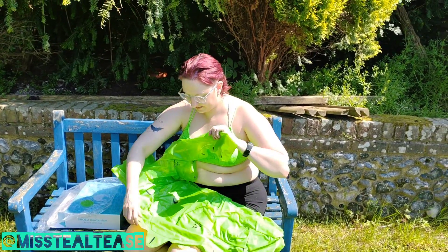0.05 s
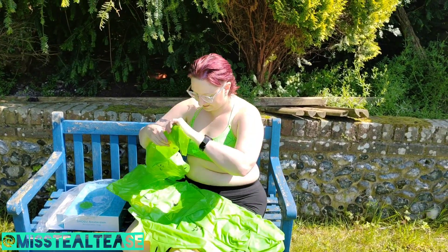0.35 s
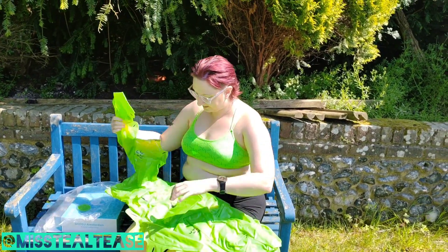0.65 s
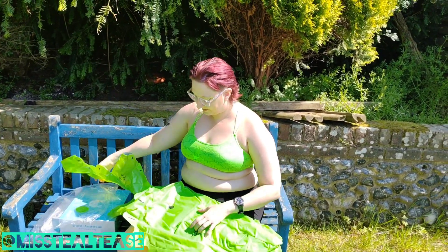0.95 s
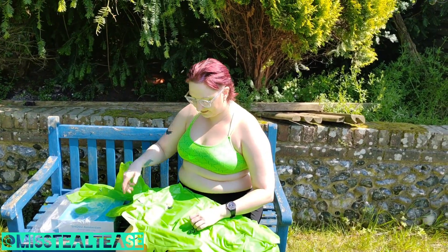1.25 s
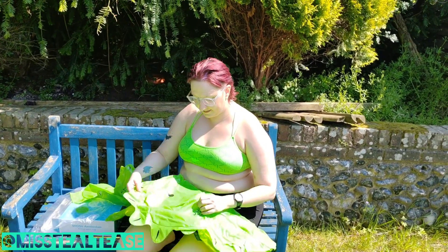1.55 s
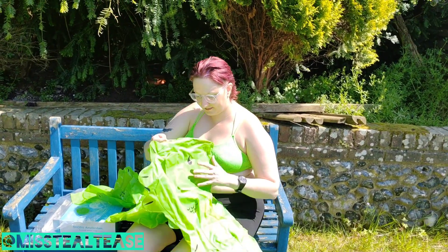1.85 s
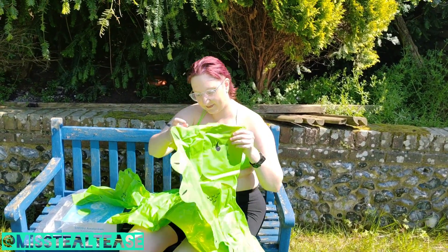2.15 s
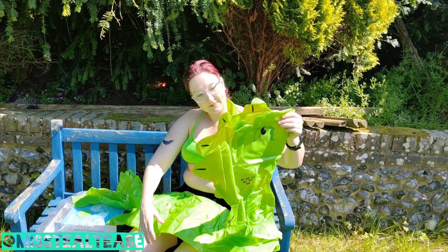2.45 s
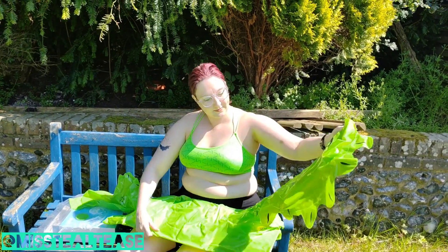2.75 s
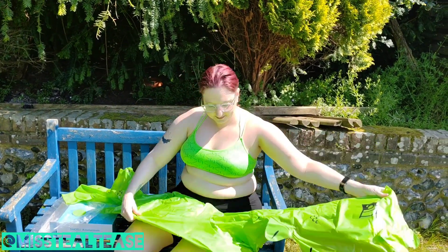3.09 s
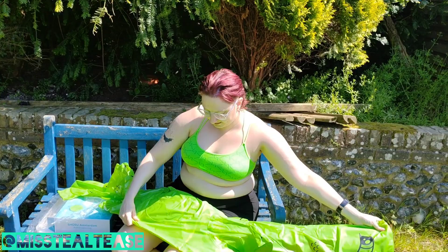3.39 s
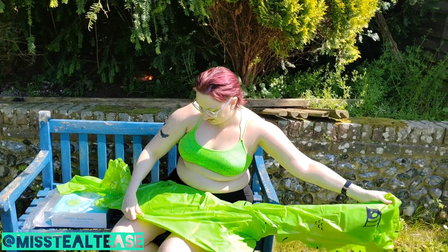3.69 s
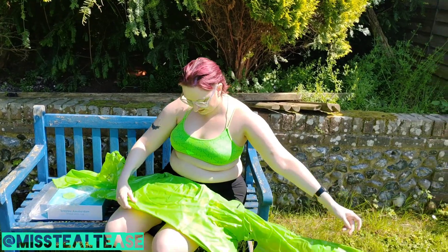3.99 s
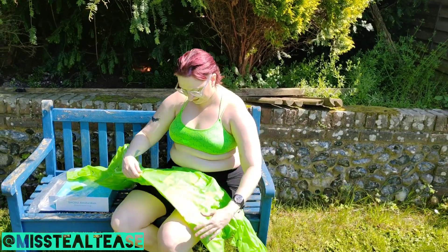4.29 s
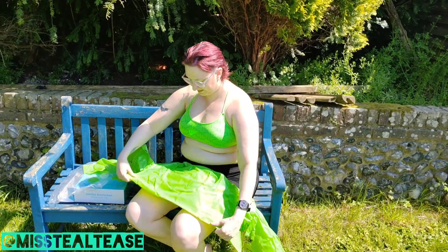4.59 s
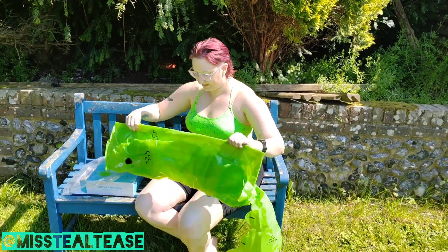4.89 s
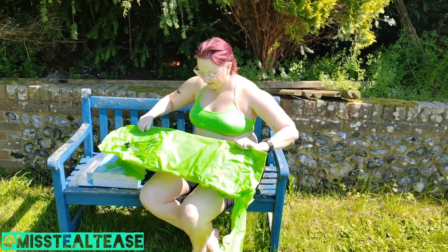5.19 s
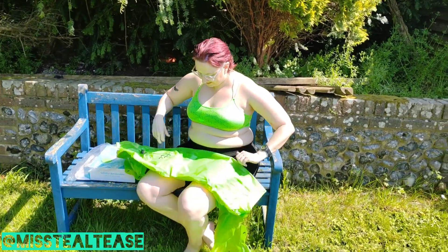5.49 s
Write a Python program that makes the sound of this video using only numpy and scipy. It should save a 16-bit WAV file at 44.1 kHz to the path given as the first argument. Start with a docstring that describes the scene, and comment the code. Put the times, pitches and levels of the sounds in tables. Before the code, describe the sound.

A small bird gives two quick, high trills while others twitter and sing short sliding chirps around a garden. Close to the microphone, a deflated vinyl inflatable is unfolded: it rustles, a fold lands with a hollow thud, and creases snap in a cluster. The birds thin out in the second half, leaving light crinkling, soft flops and a brief scrape over a faint outdoor rumble.

```python
"""First you hear a small bird's high trill and a brief rustle, over a low, distant outdoor rumble.
More birds chirp and whistle in the walled garden, each singing a nearly pure tone that slides in pitch.
Close by, a limp vinyl inflatable is unfolded on a bench: its creases snap, loose folds flop down,
and at the end vinyl scrapes on vinyl. The wall echoes the nearer birds, and the shrubs scatter
both the birdsong and the vinyl sounds."""
import sys
import numpy as np
from scipy import signal
from scipy.fft import rfft, irfft, next_fast_len
from scipy.io import wavfile
from scipy.ndimage import uniform_filter1d

SR = 44100
rng = np.random.default_rng(int(sys.argv[2]) if len(sys.argv) > 2 else 0)


def generate_wav(sig):
    """Save sig (samples, or channels by samples) to the path in sys.argv[1] as 16-bit PCM at SR."""
    pcm = np.round(np.clip(np.atleast_2d(sig).T, -1, 1) * 32767).astype(np.int16)
    wavfile.write(sys.argv[1], SR, pcm)


N = 244314
TIME = np.arange(N) / SR

# Levels compare the rows of a table; the functions turn each layer up or down afterwards.
# Tone of the outdoor background: frequency_hz, level_db
AIR_SPECTRUM = [(20, -21.5), (35, -8), (55, 1.5), (90, -4.5), (150, 4.5), (210, -4), (300, -14.5),
                (450, -21), (750, -26.5), (1200, -32), (3500, -36.5), (7000, -46.5), (16000, -52.5)]
# Slow swell of that background: time_s, level_db
AIR_LEVELS = [(0, -58), (1.0, -56), (2.1, -55), (2.9, -56), (3.2, -59.5), (3.5, -61), (3.65, -57.5),
              (4.4, -57.5), (5.54, -56)]
# High trills; each syllable is a quick fall and a held tone: start_s, fall_length_s, fall_target_hz,
# fall_db, first_held_hz, last_held_hz, held_db, held_growth_db
HIGH_TRILLS = [(0.008, 0.0066, 5070, -32, 7300, 6294, -39, 15.5),
               (0.823, 0.025, 5840, -35, 8120, 7490, -40.5, 5.5)]
# Chirps close by: start_s, length_s, start_hz, target_hz, level_db
NEAR_CHIRPS = [(0.0, 0.0093, 7220, 8580, -36), (0.138, 0.095, 8600, 6560, -53),
               (0.35, 0.11, 8290, 6720, -57.5), (0.801, 0.022, 6490, 7900, -46.5),
               (1.205, 0.013, 4030, 4210, -32.5), (1.233, 0.04, 4117, 2930, -34),
               (1.503, 0.086, 3640, 2806, -46), (1.683, 0.045, 4017, 3360, -41.5),
               (2.169, 0.026, 3984, 4057, -32), (2.707, 0.026, 5490, 4635, -47)]
# Swishes of the sheet as it is handled, or as a fold drops: start_s, end_s, level_db
SHEET_SWISHES = [(0, 0.073, -64), (0.555, 0.642, -69), (1.032, 1.087, -52), (1.602, 1.729, -51),
                 (2.102, 2.261, -54.5), (2.77, 3.13, -64.5), (4.145, 4.355, -66), (4.378, 4.45, -68),
                 (4.638, 5.01, -65), (5.143, 5.444, -61.5)]
# The loose sheet crumpling as it is lifted, spread and gathered: time_s, level_db
CRUMPLE_LEVELS = [(0, -90), (1.35, -82), (1.5, -63), (1.88, -64), (2.05, -66.5), (2.7, -69), (3.35, -68),
                  (3.9, -72), (4.55, -83.5), (5.45, -68.5), (5.52, -54)]
# Tone of crumpling and of sliding: frequency_hz, level_db
CRUMPLE_SPECTRUM = [(150, -19.5), (380, -1.5), (700, 10), (1000, 1.5), (1800, 2.5), (3500, -4.5),
                    (6000, -11.5), (10000, -20.5), (16000, -65.5)]
SLIDE_SPECTRUM = [(500, -22), (2500, -8), (5000, 13.5), (7500, 8.5), (11000, 4.5), (13500, -2),
                  (16000, -28)]
# Bird notes that slide down: start_s, length_s, target_hz, glide_s, end_level_db, swell_db
FALLING_NOTES = [(0.243, 0.09, 3327, 0.013, -38, 0.5), (0.357, 0.052, 3115, 0.01, -44.5, -7.5),
                 (0.449, 0.058, 2995, 0.011, -44.5, -7.5), (2.224, 0.055, 3160, 0.0086, -45.5, -9),
                 (2.401, 0.074, 3582, 0.014, -33, 1.5), (2.771, 0.062, 3294, 0.016, -39, -5)]
# A soft note that slides up, sung twice: start_s, target_hz
RISING_NOTES = [(2.534, 3048), (2.892, 2915)]
# The loudest creases snapping through: start_s, level_db, treble_offset_db
CREASE_SNAPS = [(0.314, -58, -27), (0.393, -46, -43), (0.582, -51.5, -2.5), (0.606, -45.5, -7),
                (0.618, -51, -5), (0.717, -52, -51), (1.512, -51, -32), (1.626, -50.5, -15),
                (1.722, -41.5, -34), (2.08, -43, -28), (2.113, -42.5, -30), (2.145, -35.5, -8),
                (2.15, -33.5, -13.5), (2.193, -36, -27), (2.212, -43, -8), (2.277, -48.5, -8),
                (2.331, -55, 2), (2.624, -52, -16), (2.786, -40, -7.5), (2.864, -52.5, -7),
                (2.923, -49, -2), (2.994, -50.5, 0), (3.117, -51.5, -9.5), (3.542, -33.5, -14.5),
                (3.619, -51.5, -21.5), (3.842, -55.5, -36), (4.092, -53, -16), (5.205, -51, -2),
                (5.361, -46, -19), (5.403, -47.5, -29)]
# Tone of a snap's body, bright edge and hollow pop: frequency_hz, level_db
SNAP_SPECTRUM = [(200, 1), (650, -8.5), (1000, -3.5), (1900, 0), (3500, -6), (6000, -12), (10000, -28),
                 (16000, -46.5)]
SNAP_TREBLE_SPECTRUM = [(1500, -3.5), (4000, 4.5), (7500, 1), (11000, -1.5), (16000, -14.5)]
SNAP_BASS_SPECTRUM = [(100, -22), (270, 1), (400, -9), (670, 12.5), (950, -1), (3000, -48)]
# Folds landing: start_s, thud_db, splash_db, splash_decay_s
FOLD_LANDINGS = [(1.059, -19.5, -35, 0.028), (1.068, -33, -56, 0.0128), (1.148, -42.5, -77, 0.014),
                 (3.543, -42, -47.5, 0.016), (5.222, -36.5, -52.5, 0.021), (5.325, -40, -61, 0.11)]
# Ringing of a slapped fold and the seat under it: pitch_hz, level_db, ring_s (time to fade by 60 dB)
FOLD_TONES = [(162.3, -14.5, 0.83), (238.3, -5, 0.21), (285.6, 0.5, 0.11), (466, -2.5, 0.043),
              (697, 4.5, 0.034), (780, -0.5, 0.055), (1307, -8, 0.046), (1520, -5.5, 0.021)]
# Tone of the splash of creases after a landing: frequency_hz, level_db
SPLASH_SPECTRUM = [(200, 9.5), (700, 7), (1600, -4), (4000, -.5), (8000, -4), (12000, -12), (16000, -25)]
# Chirps from deep in the shrubs: start_s, length_s, start_hz, target_hz, level_db
DISTANT_CHIRPS = [(1.135, 0.022, 4190, 2430, -45), (1.312, 0.061, 3876, 3034, -38),
                  (1.904, 0.11, 8360, 7890, -49), (2.14, 0.035, 4480, 4700, -44.5),
                  (2.325, 0.063, 2806, 3890, -38.5), (2.691, 0.042, 4017, 4440, -45.5),
                  (3.251, 0.14, 7670, 7610, -67.5), (3.57, 0.028, 4150, 4060, -54),
                  (3.621, 0.15, 3650, 2810, -59.5), (3.884, 0.037, 4370, 3290, -67)]
# Path of a thin, high whistle: time_s, pitch_hz, level_db
WHISTLE_PATH = [(1.647, 7720, -46.5), (1.675, 7880, -54.5), (1.752, 7950, -39), (1.803, 8130, -50),
                (1.845, 7815, -37.5), (1.889, 7590, -47.5), (1.929, 7240, -63)]


def undb(db):
    """Turn decibels into a number to multiply a sound by."""
    return 10 ** (np.asarray(db) / 20)


def add(out, start_s, sound):
    """Mix a sound into out, beginning at start_s."""
    start = max(int(start_s * SR), 0)
    part = sound[..., :max(N - start, 0)]
    out[..., start:start + part.shape[-1]] += part


def colour(sound, spectrum):
    """Give a sound the tone of a spectrum table; white noise keeps its overall power."""
    hz, db = np.transpose(spectrum)
    size = next_fast_len(sound.shape[-1] + 4096) * 2
    bin_hz = np.arange(size // 2 + 1) * SR / size
    gain = undb(np.interp(np.log(bin_hz + 1), np.log(hz), db))
    cepstrum = irfft(np.log(gain / np.sqrt(np.mean(gain ** 2))))
    # make the filter ring after a click, never before it
    cepstrum[1:size // 2] *= 2
    cepstrum[size // 2 + 1:] = 0
    return irfft(rfft(sound, size) * np.exp(rfft(cepstrum)))[..., :sound.shape[-1]]


def pan(db):
    """Left and right gains; a negative db moves the sound to the right."""
    return undb(np.array([[db], [-db]]) / 2)


def from_right(sound, pan_db, lag_samples):
    """A sound on the right reaches the left side weaker and a little later."""
    return pan(pan_db) * np.array([np.interp(TIME - lag_samples / SR, TIME, sound), sound])


def widen(pair, wide_hz, bass_width):
    """Two unrelated signals become left and right: alike in the bass, apart in the treble."""
    treble = signal.sosfilt(signal.butter(1, wide_hz, "high", fs=SR, output="sos"), pair[1])
    side = bass_width * pair[1] + (1 - bass_width) * treble
    return np.array([pair[0] + side, pair[0] - side])


def scatter(sound, ring_s, onset_s):
    """Many tiny echoes, as off leaves and stones, blur into a tail that fades 60 dB in ring_s."""
    t = TIME[:SR]
    tail = rng.standard_normal((2, SR)) * np.exp(-np.log(1000) * t / ring_s) * (1 - np.exp(-t / onset_s))
    tail /= np.sqrt(np.sum(tail ** 2, axis=1, keepdims=True))
    return signal.fftconvolve(np.atleast_2d(sound), tail, axes=1)[:, :N]


def bird_voice(hz, waver, overtone_db, ramp_s=0.002, tremble_db=0.5):
    """A bird's voice box makes a slightly unsteady, nearly pure tone with a faint octave above."""
    pitch_wobble, level_wobble = uniform_filter1d(rng.standard_normal((2, len(hz))), size=100) * 10
    phase = 2 * np.pi * np.cumsum(hz * (1 + waver * pitch_wobble)) / SR
    tone = (np.sin(phase) + undb(overtone_db) * np.sin(2 * phase)) * undb(tremble_db * level_wobble)
    soft_ends = signal.windows.tukey(len(hz), min(2 * ramp_s * SR / len(hz), 1))
    return np.sqrt(2) * tone * soft_ends


def note(length_s, start_hz, target_hz, glide_s, db, swell_db=0, waver=0.015, overtone_db=-42):
    """One bird note: the pitch slides towards a target; the level changes by swell_db to end at db."""
    t = TIME[:int(length_s * SR)]
    hz = target_hz + (start_hz - target_hz) * np.exp(-t / glide_s)
    return bird_voice(hz, waver, overtone_db) * undb(db + swell_db * (t / length_s - 1))


def crackle(samples, per_second, spread_db):
    """Vinyl buckles in tiny clicks at random times and strengths, on two channels."""
    sizes = undb(spread_db * np.minimum(rng.exponential(size=samples), 4))
    clicks = (rng.random(samples) < per_second / SR) * sizes * rng.standard_normal((2, samples))
    return clicks / np.sqrt(np.mean(clicks ** 2) + 1e-18)


def air():
    """A distant rumble under a faint hiss, slowly swelling and sinking."""
    level = undb(np.interp(TIME, *np.transpose(AIR_LEVELS)))
    noise = colour(rng.standard_normal((2, N)), AIR_SPECTRUM) * level
    return widen(noise, wide_hz=1800, bass_width=.25)


def trills(count=6, period_s=0.0332, jitter_s=0.001, top_hz=7910, sag=0.046, growth_db=6, held_s=0.013):
    """A bird repeats a fast, buzzy syllable, each one louder and lower than the last."""
    song = np.zeros(N)
    for start_s, fall_s, target_hz, fall_db, first_hz, last_hz, held_db, held_growth_db in HIGH_TRILLS:
        for k, held_hz in enumerate(np.linspace(first_hz, last_hz, count)):
            at_s = start_s + k * period_s + rng.normal() * jitter_s
            along = k / (count - 1) - .5  # -0.5 on the first syllable, +0.5 on the last
            fall = note(fall_s, top_hz, target_hz * (1 - sag * along), 0.37 * fall_s,
                        fall_db + growth_db * along, swell_db=1, waver=0.017, overtone_db=-29.5)
            held = note(held_s, held_hz, held_hz * 0.9458, held_s,
                        held_db + held_growth_db * along, waver=0.011, overtone_db=-39.5)
            add(song, at_s, fall)
            add(song, at_s + 0.016, held)
    return song


def near_chirps(glide_share=0.8):
    """Plain chirps, each one bend in pitch, split between a high voice and a low one."""
    high, low = np.zeros((2, N))
    for start_s, length_s, start_hz, target_hz, db in NEAR_CHIRPS:
        chirp = note(length_s, start_hz, target_hz, glide_share * length_s, db, swell_db=-1)
        add(high if target_hz > 4500 else low, start_s, chirp)
    return high, low


def rustle():
    """Each swish swells and fades: crumpling sheds small clicks, sliding adds a finer hiss."""
    motion = np.zeros(N)
    for start_s, end_s, db in SHEET_SWISHES:
        motion += undb(db) * np.sin(np.pi * np.clip((TIME - start_s) / (end_s - start_s), 0, 1))
    crumpling = np.hypot(motion, undb(np.interp(TIME, *np.transpose(CRUMPLE_LEVELS))))
    sliding = undb(-6) * motion
    clicks = crackle(N, per_second=700, spread_db=4.5)
    clicks = undb(-3) * clicks + undb(-2) * scatter(clicks, ring_s=0.029, onset_s=0.0036)
    grit = crackle(N, per_second=9000, spread_db=3)
    return colour(clicks * crumpling, CRUMPLE_SPECTRUM) + colour(grit * sliding, SLIDE_SPECTRUM)


def sliding_notes(fall_from_hz=5090):
    """A lower bird voice sings notes that slide down, and softly swelling ones that slide up."""
    song = np.zeros(N)
    for start_s, length_s, target_hz, glide_s, db, swell_db in FALLING_NOTES:
        add(song, start_s, note(length_s, fall_from_hz, target_hz, glide_s, db, swell_db, waver=0.012))
    for start_s, target_hz in RISING_NOTES:
        rise = note(0.093, start_hz=2345, target_hz=target_hz, glide_s=0.047, db=-43.5, swell_db=9.5)
        add(song, start_s, rise)
    return song


def snaps(give_s=0.00055, crack_s=0.00096, flutter_s=0.012, flutter_db=-14):
    """A soft crease gives way with a crack, and the loose sheet around it flutters out."""
    body, treble, bass = np.zeros((3, 2, N))
    t = TIME[:SR // 10]
    fade = np.exp(-t / crack_s) + undb(flutter_db) * np.exp(-t / flutter_s)
    shape = (1 - np.exp(-t / give_s)) * fade
    for start_s, db, treble_offset_db in CREASE_SNAPS:
        burst = rng.standard_normal((2, len(t))) * shape
        add(body, start_s, burst * undb(db + 4.5))
        add(treble, start_s, burst * undb(db + treble_offset_db + 9))
        add(bass, start_s, burst * undb(db - 45))
    return (colour(body, SNAP_SPECTRUM) + colour(treble, SNAP_TREBLE_SPECTRUM)
            + colour(bass, SNAP_BASS_SPECTRUM))


def twitter(count=12, gap_s=0.0334, slowing_s=0.0012):
    """A bird in the leaves sings two notes at once, one on each side of its voice box, and slows down."""
    song, start_s = np.zeros(N), 0.552
    for k, (upper, lower) in enumerate(1 + .02 * rng.standard_normal((count, 2))):
        add(song, start_s, note(0.012, 3650 * upper, 4050 * upper, glide_s=0.0084, db=-42, waver=.014))
        add(song, start_s, note(0.019, 3700 * lower, 3080 * lower, glide_s=0.0076, db=-47, waver=.0088))
        start_s += gap_s + k * slowing_s
    leaves = undb(-4) * scatter(song, ring_s=.09, onset_s=.002)
    garden = undb(-9) * scatter(song, ring_s=.55, onset_s=.01)
    return undb(-8) * song + leaves + garden


def flops(attack_s=0.00051):
    """A loose fold lands: a hollow thud, and a splash of creases as it settles."""
    thuds, splashes = np.zeros(N), np.zeros((2, N))
    t = TIME[:SR // 3]
    for start_s, thud_db, splash_db, decay_s in FOLD_LANDINGS:
        detune = 1 + 0.023 * rng.standard_normal(len(FOLD_TONES))
        ring = sum(undb(db - 60 * t / ring_s) * np.sin(2 * np.pi * hz * detune[k] * t) * (-1) ** k
                   for k, (hz, db, ring_s) in enumerate(FOLD_TONES))
        add(thuds, start_s, undb(thud_db - 10.5) * ring * (1 - np.exp(-t / attack_s)))
        creases = crackle(len(t), per_second=12000, spread_db=-2.5)
        add(splashes, start_s, undb(splash_db) * creases * np.exp(-t / decay_s))
    return thuds, colour(splashes, SPLASH_SPECTRUM)


def far_chirps(glide_share=0.8):
    """Birds deep in the shrubs are heard mostly as scattered sound; the lower ones are raspier."""
    song = np.zeros(N)
    for start_s, length_s, start_hz, target_hz, db in DISTANT_CHIRPS:
        rasp = .009 if target_hz > 4500 else .035
        add(song, start_s, note(length_s, start_hz, target_hz, glide_share * length_s, db, waver=rasp))
    return undb(-9.5) * song + undb(-3.5) * scatter(song, ring_s=0.47, onset_s=0.0027)


def whistle():
    """A bird holds one thin, high tone that pulses in loudness."""
    song = np.zeros(N)
    time_s, hz, db = np.transpose(WHISTLE_PATH)
    t = np.arange(time_s[0], time_s[-1], 1 / SR)
    tone = bird_voice(np.interp(t, time_s, hz), waver=0.0052, overtone_db=-53)
    add(song, time_s[0], tone * undb(np.interp(t, time_s, db)))
    return song


def scrape(start_s=5.478, rise_s=0.0067, db=-59, centre_hz=3600, width_hz=1100):
    """Vinyl drags on vinyl: many tiny slips ring in one broad band of pitch."""
    slips = crackle(N, per_second=2500, spread_db=2)
    slips = signal.lfilter(*signal.iirpeak(centre_hz, centre_hz / width_hz, fs=SR), slips)
    return slips / np.std(slips) * undb(db) * np.clip((TIME - start_s) / rise_s, 0, 1)


def walled_garden(song, echo_s=0.008):
    """Nearby song arrives directly, bounces off the wall and scatters around the garden."""
    wall = undb(-4) * scatter(song, ring_s=.2, onset_s=.008)
    add(wall, echo_s, undb(-8) * song)
    garden = undb(-5) * scatter(song, ring_s=0.36, onset_s=0.0052)
    return undb(-2) * song + wall + garden


def scene():
    """The vinyl close by, the birds around it, the air behind."""
    high_chirps, low_chirps = near_chirps()
    high_bird = from_right(trills() + high_chirps + whistle(), pan_db=-4, lag_samples=2)
    low_bird = from_right(low_chirps + sliding_notes(), pan_db=-1.2, lag_samples=3)
    birds = walled_garden(high_bird + low_bird) + twitter() + far_chirps()
    thuds, splashes = flops()
    crinkles = widen(rustle() + snaps() + splashes + scrape(), wide_hz=2200, bass_width=.12)
    vinyl = pan(-.6) * (crinkles + thuds)
    vinyl_echo = undb(-9.5) * scatter(vinyl, ring_s=0.23, onset_s=0.0018)
    return air() + birds + vinyl + vinyl_echo


def record(dry, top_hz=15800):
    """The recorder cuts off the very highest treble."""
    return signal.sosfilt(signal.ellip(8, .2, 70, top_hz, fs=SR, output="sos"), dry)


dry = scene()
out = record(dry)
generate_wav(out)
```